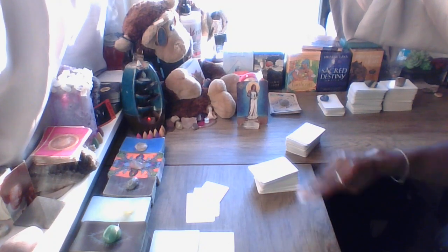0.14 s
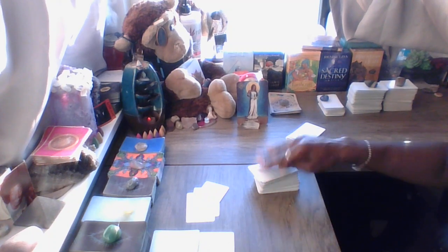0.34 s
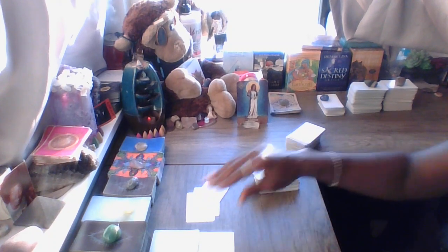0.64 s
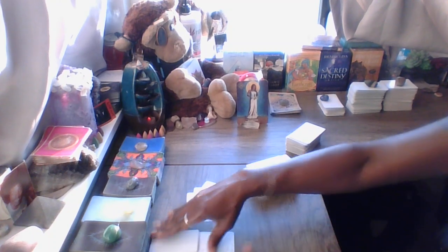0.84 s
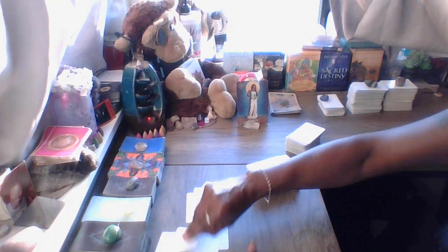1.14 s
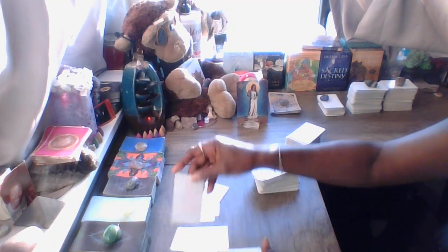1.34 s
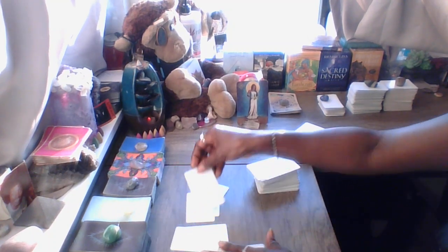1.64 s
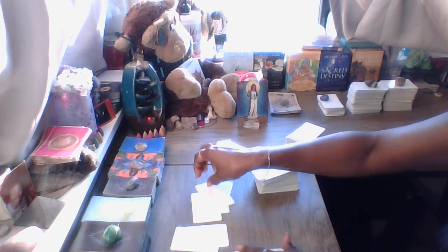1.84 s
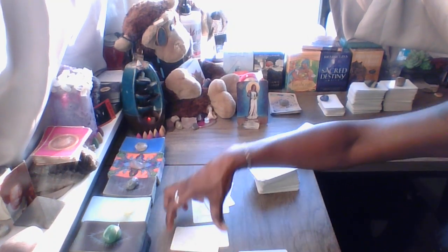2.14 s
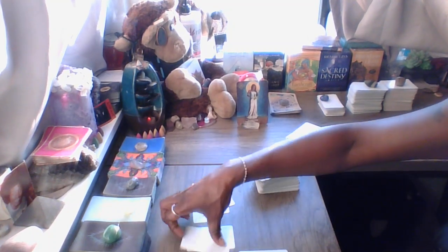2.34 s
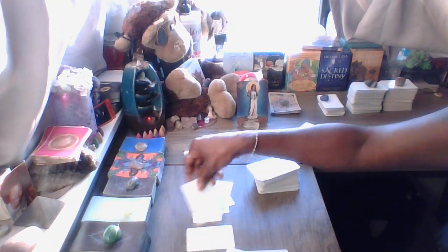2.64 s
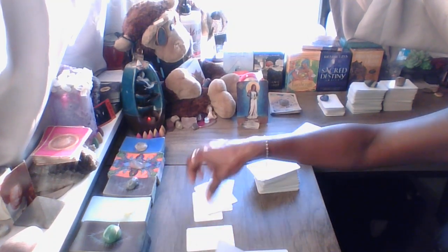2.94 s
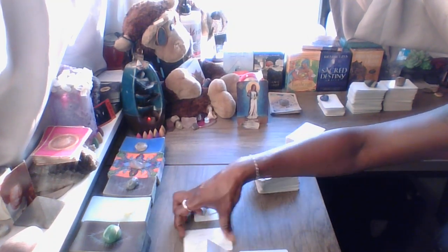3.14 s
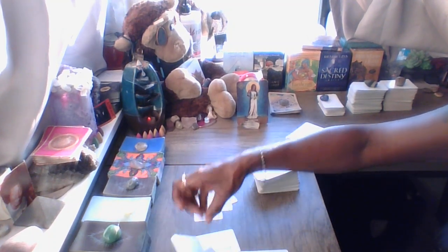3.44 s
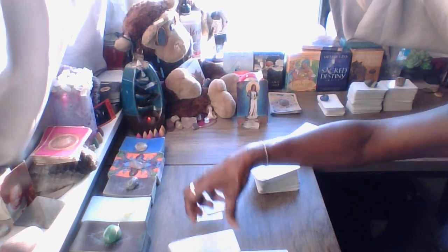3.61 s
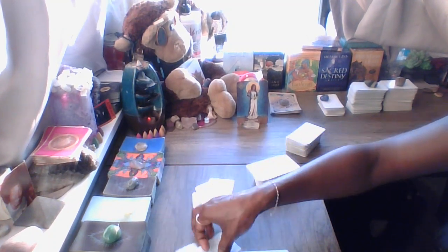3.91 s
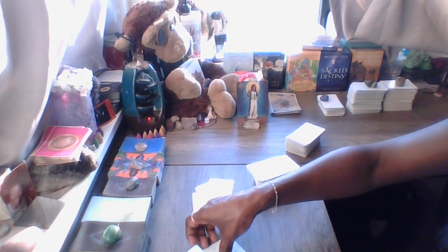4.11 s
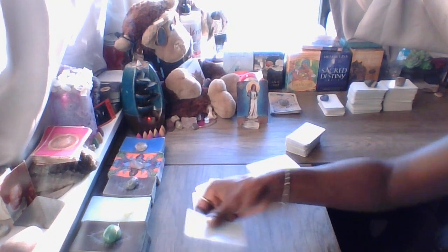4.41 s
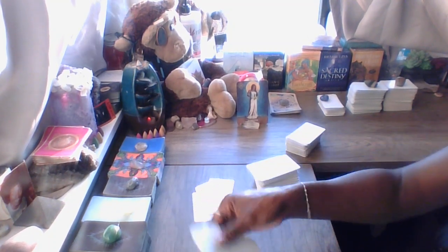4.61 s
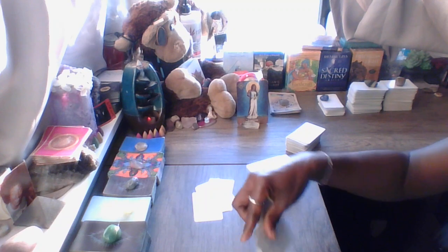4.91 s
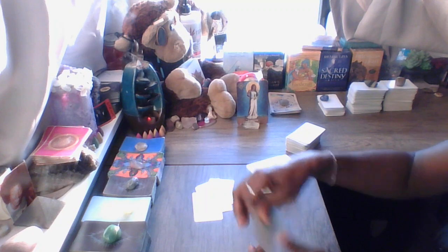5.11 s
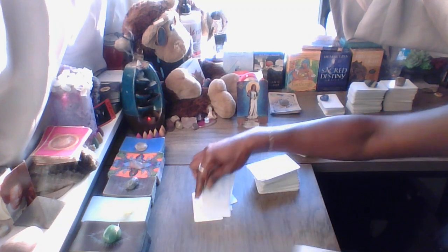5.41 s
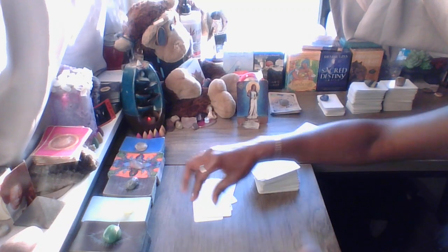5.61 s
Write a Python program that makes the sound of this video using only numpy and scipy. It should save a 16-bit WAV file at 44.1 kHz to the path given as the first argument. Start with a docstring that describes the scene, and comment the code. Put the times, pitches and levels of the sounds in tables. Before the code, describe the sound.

A hand handles cards on a wooden desk: one strong slap early, scattered crisp edge clicks, paired hollow knocks as packets are set down, grainy drags across wood and papery hiss. The middle is busiest; later it thins to scuffs and small ticks before a last snap. Close, dry, slightly band-limited microphone with noise-suppressed pauses.

```python
"""A wooden desk in a small dry room: a hand gathers stiff cards and sets them down, close to a microphone.
Card edges snap as coloured noise cracks; blows and bumps ring the modes of the desk.
Cards glide and drag as grainy friction noise, and quick scuffs are swelling bands of noise.
A short noise tail makes the room; a noise suppressor then turns down every band that falls too quiet."""
import sys
import numpy as np
from scipy import signal
from scipy.fft import rfft, irfft, next_fast_len
from scipy.io import wavfile
from scipy.ndimage import uniform_filter1d, map_coordinates

SR = 44100
rng = np.random.default_rng(int(sys.argv[2]) if len(sys.argv) > 2 else 0)


def waveform_to_disk(signal):
    """Save audio, clipped to [-1, 1], as 16-bit WAV at the path in sys.argv[1]."""
    frames = np.transpose(np.atleast_2d(signal))
    scaled = np.clip(frames, -1, 1) * 32767
    samples = np.round(scaled).astype(np.int16)
    wavfile.write(sys.argv[1], SR, samples)


N = 254016
TOP_HZ = 9600  # upper edge of the sound
T = np.arange(SR // 4) / SR  # time within one event, s
HZ = np.fft.rfftfreq(len(T), 1 / SR)


def amp(db):
    """Decibels to gain."""
    return 10 ** (np.asarray(db) / 20)


def unit(x):
    """Scale to rms 1."""
    return x / np.sqrt(np.mean(x ** 2) + 1e-20)


def crest(x, size):
    """Scale so that the loudest stretch of size samples has rms 1."""
    return x / np.sqrt(uniform_filter1d(x ** 2, size, mode="constant").max() + 1e-20)


def along(points, hz):
    """Read (Hz, value) points on a log frequency axis."""
    f, v = np.transpose(points)
    return np.interp(np.log(hz + 1), np.log(f), v)


def filtered(x, gain):
    """Apply a gain that depends on frequency."""
    size = next_fast_len(N + SR // 2)
    return irfft(rfft(x, size) * gain(np.fft.rfftfreq(size, 1 / SR)), size)[:N]


def causal(x, db):
    """Colour one event without smearing its attack backwards (minimum phase)."""
    size = len(T)
    cepstrum = irfft(np.log(amp(db) + 1e-6), size)
    cepstrum[1:size // 2] *= 2
    cepstrum[size // 2:] = 0
    return irfft(rfft(x) * np.exp(rfft(cepstrum)), size)


def add(track, s, x):
    """Mix x into the track from time s."""
    start = max(0, round(s * SR))
    track[start:start + len(x)] += x[:max(0, N - start)]


def wobble(rate):
    """A smooth random curve, rate knots a second."""
    knots = rng.standard_normal(int(N * rate / SR) + 4)
    return map_coordinates(knots, [np.arange(N) * rate / SR])


def shifting(x, depth_db, width_hz, life):
    """The card's bend and contact point keep changing, so its resonances come and go; life in s."""
    hz, t, z = signal.stft(x, SR, nperseg=512)
    knots = rng.standard_normal(size=(400, 600))
    places = np.meshgrid(hz / width_hz, t / life, indexing="ij")
    field = map_coordinates(knots, places, order=1, mode="wrap")
    gain = amp(depth_db * np.tanh(unit(field)))
    return unit(signal.istft(z * gain, nperseg=512)[1][:N])


def friction(spectrum, slips, smooth, uneven_db, uneven_rate):
    """Tiny slips (so many a second) over a smooth rub, under unsteady finger pressure; rms 1."""
    grains = unit((rng.random(N) < slips / SR) * rng.standard_normal(N))
    rub = grains + smooth * rng.standard_normal(N)
    force = rub * amp(uneven_db * wobble(uneven_rate))
    return unit(filtered(force, lambda hz: amp(along(spectrum, hz))))


def stroke(start, length, attack, release, swell_db=0):
    """One push of the hand: it gets going, holds while swelling or easing, and dies away; times in s."""
    t = np.arange(N) / SR - start
    hold = amp(swell_db * (np.clip(t / length, 0, 1) - .5))
    return np.clip(t / attack, 0, 1) * hold * np.exp(-np.maximum(t - length, 0) / release)


# decay of the room: f/Hz, t60/s
ROOM_DECAY = [(100, .15), (300, .15), (800, .07), (2000, .1), (5000, .1), (9000, .08)]


def room(x, build=0.0014):
    """Desk, shelves and curtains answer with a short dense noise tail, drawn anew each quarter second."""
    out = np.zeros(N)
    for start in range(0, N, len(T)):
        hz, t, z = signal.stft(rng.standard_normal(len(T)), SR, nperseg=256)
        decay = amp(-60 * t / along(ROOM_DECAY, hz)[:, None])
        tail = signal.istft(z * decay, SR, nperseg=256)[1][:len(T)]
        tail = tail * (1 - np.exp(-T / build))
        piece = x[start:start + len(T)]
        add(out, start / SR, signal.fftconvolve(piece, tail / np.linalg.norm(tail)))
    return out


# fingers and the heel of the hand bump the desk: t/s, level/dB
HAND_BUMPS = [(0.303, -43), (0.371, -46), (.462, -8.5), (0.818, -51), (0.961, -39.5), (1.683, -40.5),
              (1.757, -46), (4.659, -46), (5.213, -47.5), (5.371, -37), (5.398, -30.5), (5.573, -37)]
# lowest modes of the whole desk: f/Hz, level/dB before scatter, t60/s
FRAME_MODES = [(73.5, -15, .11), (106.9, -5, .1), (147.8, 4.5, .11), (188.7, -2, .11), (271.5, -13, .07)]


def bumps(attack=0.0015, scatter_db=1):
    """A soft heavy contact builds up gently and rocks the whole desk in its lowest modes."""
    out = np.zeros(N)
    for s, db in HAND_BUMPS:
        boom = np.zeros(len(T))
        for hz, mode_db, t60 in FRAME_MODES:
            level_db = mode_db + scatter_db * rng.standard_normal()
            boom += amp(level_db - 60 * T / t60) * np.sin(2 * np.pi * hz * T)
        boom *= (1 - np.exp(-T / attack)) ** 2
        add(out, s, amp(db) * crest(boom, size=440))
    return out


# a packet is pressed and dragged over the wood:
# t/s at the start, length/s, rasp level/dB, desk judder re the rasp/dB, swell over the stroke/dB
PACKET_DRAGS = [(0.135, 0.038, -56, 2, -3), (0.992, 0.066, -46.5, -31, -5), (1.1, .03, -34.5, -13, 3),
                (1.162, 0.036, -49, -35, 1.5), (1.623, 0.068, -44, -4, -1.5), (2.275, .115, -28.5, -1, 4),
                (2.406, .08, -38, -20, 13.5), (2.496, 0.11, -31.5, 1.5, 4.5), (2.672, 0.053, -36, -3.5, 3),
                (2.738, 0.052, -46, -26.5, -4.5), (2.88, .035, -48, 9, -0.5), (3.25, 0.079, -33, -1, -18.5),
                (3.333, .13, -39, 2, 7.5), (3.722, 0.24, -39.5, -4, 2), (3.86, 0.084, -56, 7.5, 8.5),
                (3.977, 0.074, -40, -3, -1), (4.035, 0.033, -40, -19, 6), (4.099, 0.049, -34, -13.5, 14.5),
                (4.306, 0.13, -46.5, -28, -1), (4.574, 0.091, -43.5, -22, -6),
                (5.03, 0.097, -47, -0.5, 4.5), (5.406, 0.1, -42, -6, -7)]
# spectrum of the rasping edge: f/Hz, level/dB
RASP_SPECTRUM = [(200, -44), (420, -10), (600, -1.5), (850, 2.5), (1050, -3), (1350, -14), (2200, -15),
                 (4000, -46)]
# spectrum of the growling desk: f/Hz, level/dB
JUDDER_SPECTRUM = [(30, -61.5), (80, -25.5), (120, -9), (175, 4), (240, -5), (310, 2), (420, -15.5),
                   (800, -50)]


def drags(attack=0.0083, release=0.013):
    """An edge pressed on the grain rasps and makes the desk growl."""
    rasp = friction(RASP_SPECTRUM, slips=400, smooth=1.0, uneven_db=1.0, uneven_rate=48)
    rasp = shifting(rasp, depth_db=9.5, width_hz=129.1, life=0.03)
    judder = friction(JUDDER_SPECTRUM, slips=150, smooth=0.26, uneven_db=8.0, uneven_rate=46)
    out = np.zeros(N)
    for s, length, db, judder_db, swell_db in PACKET_DRAGS:
        push = stroke(s, length, attack, release, swell_db)
        out += amp(db) * push * (rasp + amp(judder_db) * judder)
    return out


# a card glides over other cards:
# t/s at the start, length/s, level/dB, brightness/dB (treble over bass), swell over the stroke/dB
CARD_GLIDES = [(0, 0.079, -48.5, -9.5, -11), (0.086, 0.21, -46, -10, -9.5), (0.306, 0.02, -39, -3.5, 5.5),
               (0.358, 0.077, -47, 0.5, -7), (0.489, 0.054, -40, -10.5, -4), (0.617, 0.068, -59.5, 18, 4),
               (0.77, 0.082, -48.5, -17.5, 1.5), (0.934, 0.1, -41.5, 4.5, 7),
               (1.146, 0.15, -40.5, 6.5, 4.5), (1.29, 0.19, -41.5, 0, -11), (1.594, 0.096, -42.5, -4, 14.5),
               (1.725, 0.17, -39.5, -5.5, 8.5), (1.962, 0.085, -48, -8, -14), (2.127, 0.12, -49.5, -3, -6),
               (2.31, 0.23, -39.5, -1.5, -11), (2.459, 0.17, -36, -12, 0.5), (2.669, 0.17, -42, -4, 5.5),
               (2.892, 0.16, -49.5, 6, -13), (3.248, 0.13, -40.5, -12.5, -14),
               (3.381, 0.046, -34, -4, -3.5), (3.711, 0.11, -43.5, -10.5, 4.5),
               (3.861, 0.063, -39.5, -5, 6.5), (3.978, 0.066, -45.5, -7, 13.5),
               (4.106, 0.077, -46.5, -14, -2.5), (4.22, 0.205, -47, -19.5, 9),
               (4.583, 0.19, -38, -2.5, -15), (4.868, 0.06, -46, 1.5, 5.5), (4.955, 0.042, -50.5, -21, 11),
               (5.022, 0.078, -39, 9.5, 8), (5.255, 0.057, -44.5, 5, 1), (5.361, 0.11, -38.5, 5, 15.5),
               (5.481, 0.22, -41.5, -2, -12.5)]
# spectrum of sliding card faces: f/Hz, level/dB
HISS_SPECTRUM = [(300, -45), (1000, -18), (1500, -8.5), (2400, -2), (3500, 0), (5500, -1.5), (7200, -3),
                 (9000, -6), (12000, -37.5)]
# spectrum of a card edge, shared with the snaps: f/Hz, level/dB
EDGE_SPECTRUM = [(150, -47), (500, -14), (1200, -10.5), (2200, 2.5), (3500, 5.5), (5500, 2), (7500, -4.5),
                 (9000, -5), (12000, -35.5)]


def glides(attack=0.0049, release=0.02, tick_db=-7, ticks_per_s=70):
    """Card faces hiss over each other, each stroke with its own brightness; edges tick past one another."""
    hiss = friction(HISS_SPECTRUM, slips=800, smooth=1.0, uneven_db=0.5, uneven_rate=140)
    hiss = shifting(hiss, depth_db=10.5, width_hz=220, life=.05)
    ticks = friction(EDGE_SPECTRUM, slips=ticks_per_s, smooth=0, uneven_db=5.0, uneven_rate=16)
    faces = hiss + amp(tick_db) * ticks
    dull = filtered(faces, lambda hz: 1 / (1 + (hz / 4200) ** 4))
    bright = faces - dull
    out = np.zeros(N)
    for s, length, db, bright_db, swell_db in CARD_GLIDES:
        tinted = dull * amp(-bright_db / 2) + bright * amp(bright_db / 2)
        out += amp(db) * stroke(s, length, attack, release, swell_db) * tinted
    return out


# quick scrapes (wide) and stick-slip chirps (narrow):
# t/s at the crest, level/dB before trim and roughness, rise/s, fall/s, centre f/Hz, width/octaves
CARD_SCUFFS = [(.1, -41.5, 0.014, 0.02, 510, 0.2), (.147, -33.5, .02, .018, 4350, 0.66),
               (0.795, -44.5, .013, 0.004, 1248, 0.064), (1.117, -26.5, .03, 0.017, 3194, 1.15),
               (1.312, -24.5, .015, 0.0062, 2990, 0.5), (1.313, -25, .008, 0.0032, 985, 0.19),
               (1.828, -20, .008, 0.021, 2910, 2.6), (1.93, -26.5, .002, 0.015, 1812, 1.1),
               (2.141, -46.5, .009, 0.065, 1285, 0.36), (2.629, -31, .03, 0.0087, 2080, .27),
               (2.776, -27, .01, 0.005, 2710, 0.41), (2.861, -23.5, .0057, 0.0075, 3844, 2.7),
               (3.892, -26.5, .014, 0.015, 316, 0.19), (4.052, -29.5, .0061, 0.011, 680, 0.23),
               (4.144, -35, 0.0099, 0.0062, 1720, 0.38), (4.147, -14.5, 0.0059, 0.0034, 648, 0.053),
               (4.189, -36.5, .016, 0.054, 958, 0.053), (4.258, -35, 0.0044, 0.0051, 1186, 0.11),
               (4.411, -19.5, .013, 0.0057, 2650, 0.76), (4.411, -33.5, .017, 0.0088, 980, 0.25),
               (5.102, -34, .035, 0.026, 1300, 0.91), (5.168, -38, .0056, 0.0063, 1110, 0.12),
               (5.276, -45, 0.024, 0.021, 1286, 0.81), (5.666, -14, .011, 0.0022, 4870, 1.44),
               (5.665, -25.5, .013, 0.0016, 960, 1.2), (5.579, -24, 0.0062, 0.012, 360, 0.11)]


def scuffs(trim_db=-1, rough_db=3):
    """A card catches and slips free: a band of noise swells, stops and flickers roughly in level."""
    out = np.zeros(N)
    lead = T[-1] / 2
    for s, db, rise, fall, hz, width in CARD_SCUFFS:
        band = np.exp(-.5 * (np.log2((HZ + 1) / hz) / width) ** 2)
        rub = irfft(rfft(rng.standard_normal(len(T))) * band, len(T))
        swell = np.exp(np.minimum((T - lead) / rise, (lead - T) / fall))
        add(out, s - lead, amp(db + trim_db) * crest(rub * swell, size=220))
    return out * amp(rough_db * wobble(400))


# blows on the desk top: t/s, level/dB before trim, hardness/dB per octave, boost of the hollow spot/dB
DESK_BLOWS = [(.207, -36, 9.5, -18), (0.446, -24, 1, -4.5), (.47, -17.5, -0.5, 4), (0.954, -39, 16.5, -8.5),
              (1.085, -29, 9.5, -11.5), (1.832, -22.5, 0.5, 13.5), (1.931, -23.5, 2, 12.5),
              (2.262, -16, 2, -11), (2.321, -19, 12, -16), (2.333, -12, 10.5, -26.5), (2.373, -26, 5, -9),
              (2.541, -33.5, 2, -1.5), (2.589, -32.5, -15, -2), (2.717, -27, 5, 6.5),
              (2.867, -18.5, -2, 11), (3.183, -13.5, 2, -18.5), (3.228, -12, 10, -24.5),
              (3.237, -14, 9.5, -12), (3.391, -21.5, 3, 1), (3.43, -32.5, -4.5, -1), (3.765, -13, 0, -13),
              (4.836, -34, 9.5, 0.5), (4.995, -30, 5.5, -2), (5.573, -22, -4, 4), (5.659, -28, 15, -9)]
# modes of the desk top and what lies on it: f/Hz, level/dB before blow and scatter, t60/s
DESK_MODES = [(129.1, -20, 0.17), (150.6, 7, 0.096), (193.4, 7.5, 0.13), (298, 4.5, 0.048), (339, 1, 0.13),
              (517.6, -1.5, 0.19), (664, -2.5, 0.14), (660, -6, 0.01), (793, 1.5, 0.076), (913, -1, 0.064),
              (1042, -3.5, 0.052), (1133, -7.5, 0.05), (1504, -7.5, 0.013), (2120, -7, 0.038)]
# lower and upper end of the range over which hardness tilts a blow: f/Hz
TILT_RANGE = [158, 840]
HOLLOW_HZ, HOLLOW_OCTAVES = 500, 0.27  # the hollow spot of the desk top


def blow_drive(hz, hardness_db, hollow_db):
    """How hard a blow drives each frequency, in dB: hardness lifts the high end, the hollow spot peaks."""
    tilt = hardness_db * np.log2(np.clip(hz, *TILT_RANGE) / HOLLOW_HZ)
    peak = np.exp(-.5 * (np.log2((hz + 1) / HOLLOW_HZ) / HOLLOW_OCTAVES) ** 2)
    return tilt + hollow_db * peak


def knocks(trim_db=-1, attack=0.00079, scatter_db=2.5, detune=0.0064, clatter=0.56, clatter_t60=.09,
           bass_cut_db=40, treble_cut_db=36):
    """Each blow rings the desk modes; soft ones favour the low modes, hard ones the high."""
    out = np.zeros(N)
    hz, mode_db, t60 = np.transpose(DESK_MODES)
    low, high = TILT_RANGE
    edges = along([(50, -bass_cut_db), (low, 0), (high, 0), (3000, -treble_cut_db)], HZ)
    for s, db, hardness_db, hollow_db in DESK_BLOWS:
        level_luck, pitch_luck, phase_luck = rng.standard_normal((3, len(DESK_MODES), 1))
        level_db = blow_drive(hz, hardness_db, hollow_db) + mode_db
        strength = amp(level_db[:, None] + scatter_db * level_luck)
        pitch = hz[:, None] * (1 + detune * pitch_luck)
        swing = np.sin(2 * np.pi * pitch * T + np.pi * phase_luck)
        ring = np.sum(strength * swing * amp(-60 * T / t60[:, None]), axis=0)
        # loose things on the desk blur the ring
        noise = rng.standard_normal(len(T)) * amp(-60 * T / clatter_t60)
        rattle = causal(noise, blow_drive(HZ, hardness_db, hollow_db) + edges)
        blow = crest(ring, size=440) + clatter * crest(rattle, size=440)
        blow *= 1 - np.exp(-T / attack)
        add(out, s, amp(trim_db + db) * crest(blow, size=440))
    return out


# card edges snapping and tapping: t/s at the crack, level/dB before trim, tilt/dB per octave
EDGE_SNAPS = [(0.092, -20.5, 1), (.2078, -11.5, 3), (0.2941, -24.5, 3), (0.315, -29, 2.5), (.3728, -31, -4),
              (0.4445, -14, -2.5), (0.4517, -16, -0.5), (.4585, -18, 3), (0.4723, -5.5, 1.5),
              (0.795, -35, -7.5), (0.9544, -28, 7.5), (1.076, -19.5, -3), (1.083, -13.5, 1.5),
              (1.357, -32.5, -3.5), (1.5185, -37.5, -5), (1.6679, -22, -3), (1.6802, -26.5, 14.5),
              (1.7621, -23.5, -6), (1.8232, -14, -9.5), (1.8317, -11, 3.5), (1.8427, -12, -10),
              (1.9255, -7.5, 7), (1.9281, -12, -8), (2.2638, -15.5, -11.5), (2.3201, -21.5, -5),
              (2.3287, -16.5, 2), (2.3342, -19.5, -6), (2.705, -26, -2), (2.8622, -38, -4),
              (2.8653, -4, 4.5), (3.1837, -11, -8), (3.2274, -9, -6), (3.2279, -14.5, 10.5),
              (3.2383, -12.5, -7.5), (3.391, -18.5, 3.5), (3.6469, -24.5, 0.5), (3.7672, -17.5, -1),
              (4.065, -37, -0.5), (4.2412, -32, -8), (4.2863, -39.5, -5), (4.3437, -22, -5.5),
              (4.591, -29.5, 16), (4.6029, -19.5, 2), (4.7242, -24.5, 15), (4.8235, -27.5, 0),
              (4.835, -19, -3.5), (4.997, -18, -3), (5.0598, -23.5, -2), (5.0954, -26, -2),
              (5.166, -23.5, 3.5), (5.266, -30, 2), (5.28, -31, -5.5), (5.564, -20.5, -3),
              (5.5716, -10.5, -4.5)]


def snaps(trim_db=1, rise=0.00091, fall=0.0013, second_db=-18, second_fall=0.0012, colour_db=3.0,
          catch_db=-28, catch=0.01):
    """A bent edge catches faintly and lets go: a sharp crack, coloured anew by each grip; times in s."""
    out = np.zeros(N)
    lead = .02  # room before the crack for the catch to build up
    before, after = np.maximum(lead - T, 0), np.maximum(T - lead, 0)
    climb = np.exp(-before / rise) + amp(catch_db) * np.exp(-before / catch)
    drop = np.exp(-after / fall) + amp(second_db) * np.exp(-after / second_fall)
    for s, db, tilt_db in EDGE_SNAPS:
        burst = rng.standard_normal(len(T)) * climb * drop
        grip = np.interp(HZ, np.linspace(0, TOP_HZ, 40), rng.standard_normal(40))
        tilt = tilt_db * np.log2(np.clip(HZ, 1500, 8000) / 4000)
        colour = along(EDGE_SPECTRUM, HZ) + tilt + colour_db * grip
        add(out, s - lead, amp(db + trim_db) * crest(causal(burst, colour), size=66))
    return out


def scene(card_room_db=-6, desk_room_db=-12):
    """Cards and desk, each with its share of the room."""
    cards = snaps() + scuffs()
    desk = knocks() + glides() + drags() + bumps()
    send = amp(card_room_db) * cards + amp(desk_room_db) * desk
    return (cards + desk + room(send))[None]


# level below which the suppressor shuts a band: f/Hz, level/dB
SUPPRESSOR_THRESHOLD = [(100, -62.5), (400, -55.5), (1000, -62.5), (1500, -59.5), (3000, -61.5),
                        (8000, -72)]


def suppress(x, depth_db=-36):
    """The noise suppressor turns down every band below its threshold, by 36 dB at most."""
    hz, t, z = signal.stft(x, SR, nperseg=512)
    power = uniform_filter1d(np.abs(z) ** 2, size=2, axis=0)
    power = uniform_filter1d(power, size=5, axis=1)
    threshold = amp(along(SUPPRESSOR_THRESHOLD, hz))[:, None] ** 2
    margin = (power / threshold) ** 3
    gain = np.maximum(margin / (1 + margin), amp(depth_db))
    return signal.istft(z * gain, nperseg=512)[1][:N]


# response of the microphone: f/Hz, level/dB
MIC_RESPONSE = [(1000, -1.5), (4000, -5.5), (7400, -1.5), (8200, -10), (8800, -24.5), (9600, -51.5)]


def record(dry, self_noise_db=-74, low_cut_hz=72):
    """Microphone hiss, noise suppression, clipping of peaks past full scale and a narrow band."""
    hissy = dry[0] + amp(self_noise_db) * rng.standard_normal(N)
    clean = np.clip(suppress(hissy), -1, 1)
    low_cut = signal.butter(3, low_cut_hz, "highpass", fs=SR, output="sos")
    clean = signal.sosfilt(low_cut.repeat(2, axis=0), clean)  # the cut is applied twice
    return filtered(clean, lambda hz: amp(along(MIC_RESPONSE, hz)) * (hz < TOP_HZ))[None]


dry = scene()
out = record(dry)
waveform_to_disk(out)
```